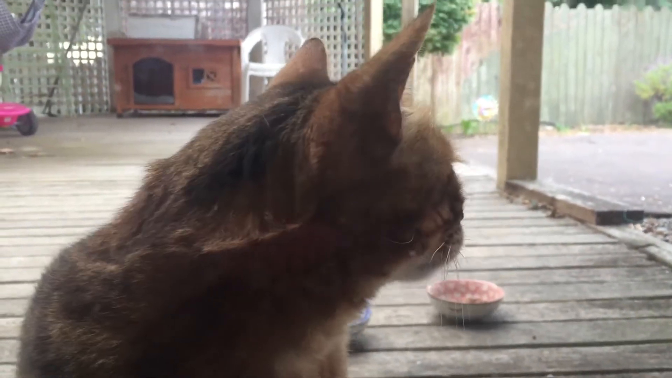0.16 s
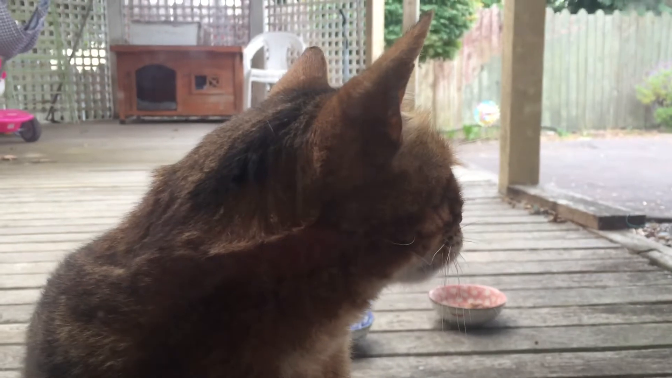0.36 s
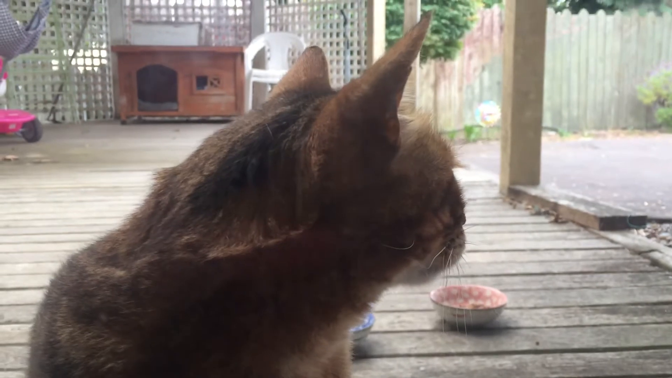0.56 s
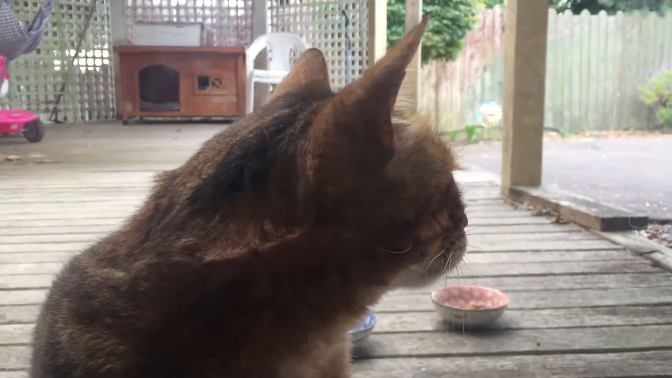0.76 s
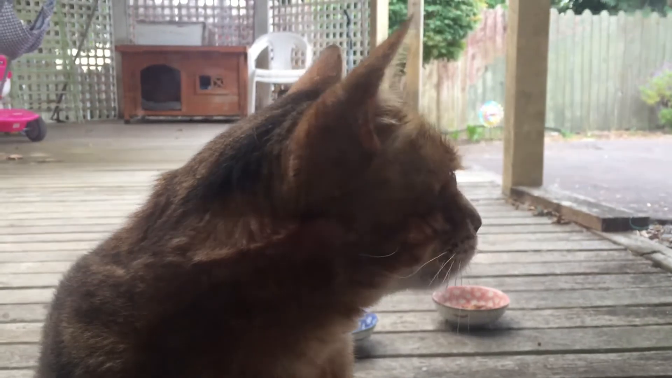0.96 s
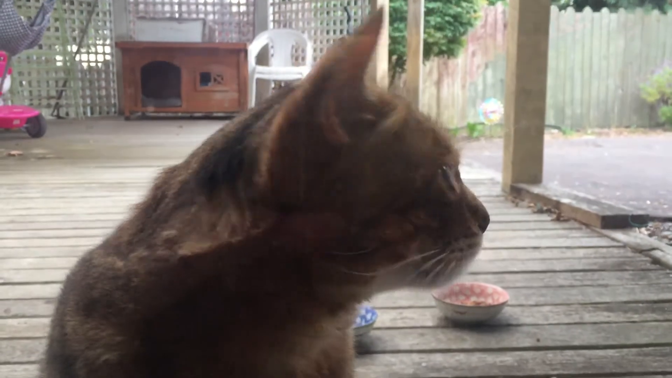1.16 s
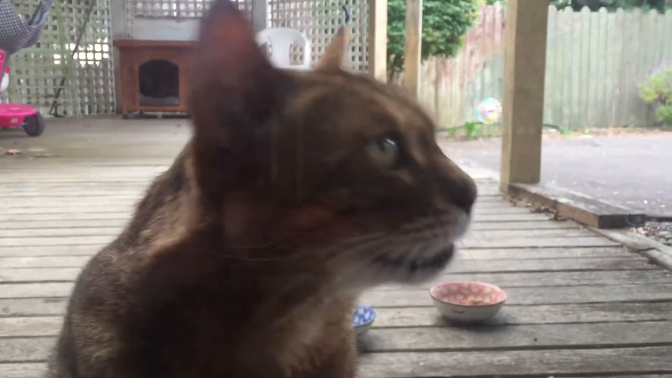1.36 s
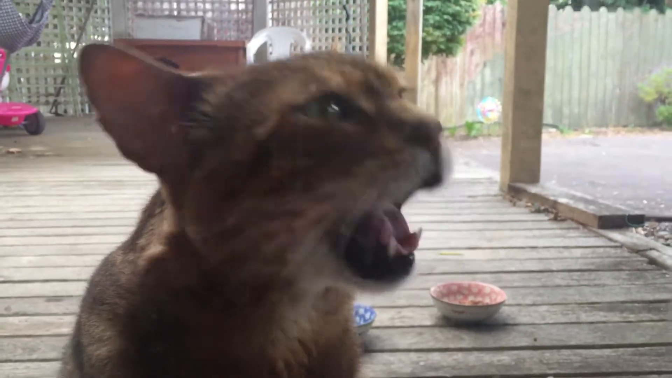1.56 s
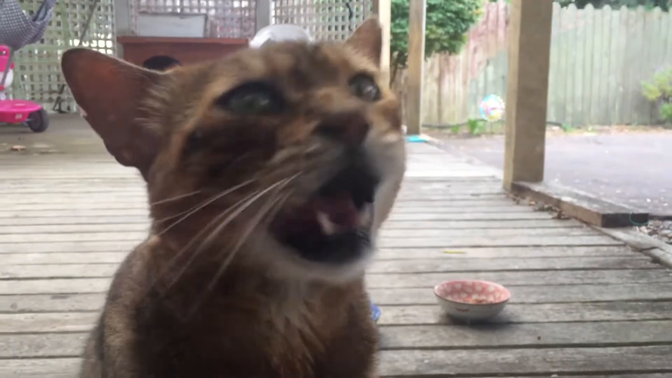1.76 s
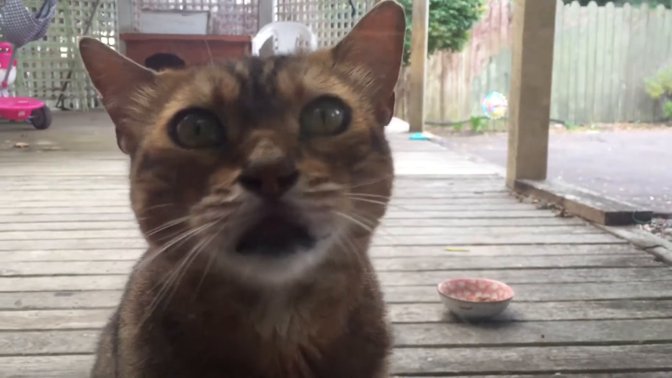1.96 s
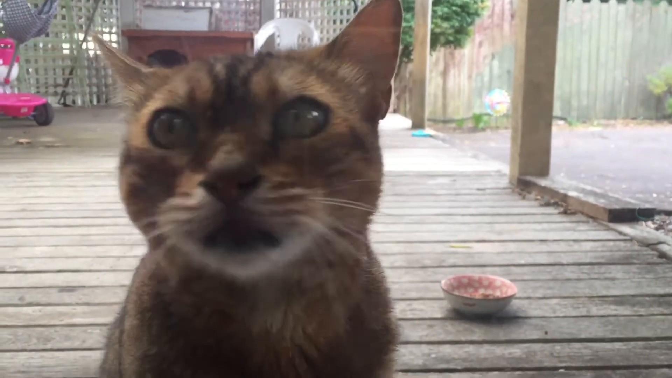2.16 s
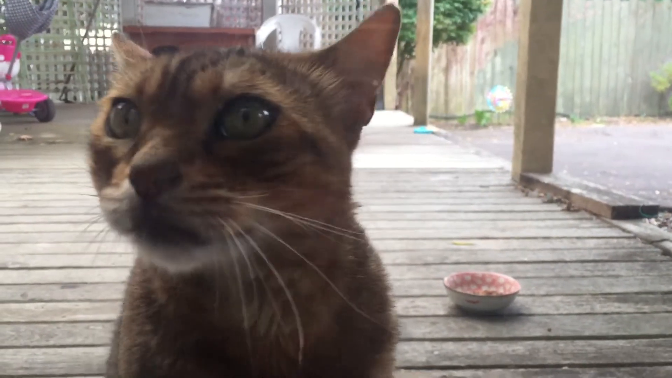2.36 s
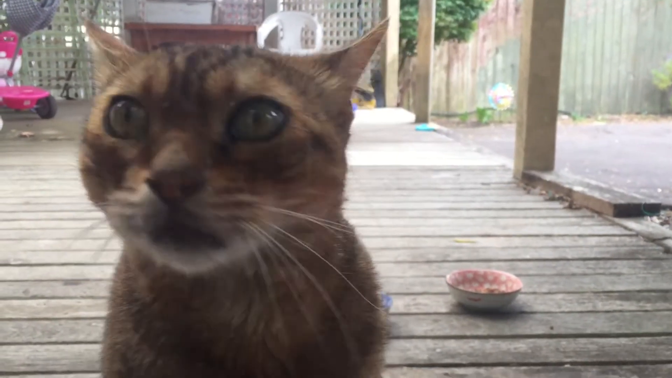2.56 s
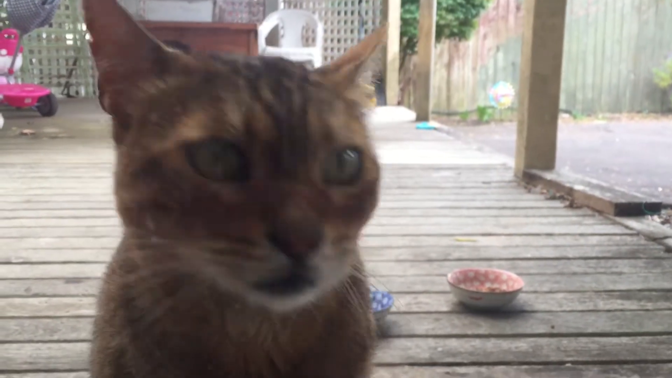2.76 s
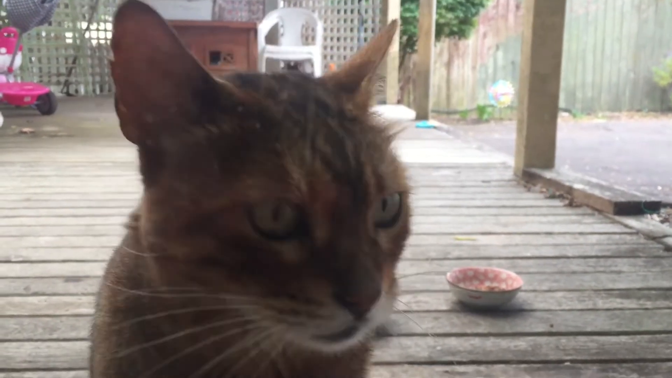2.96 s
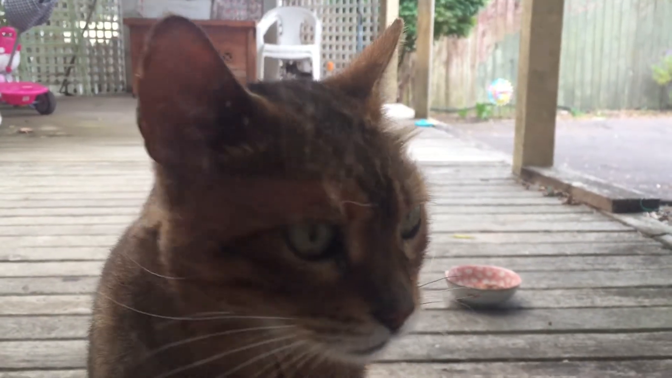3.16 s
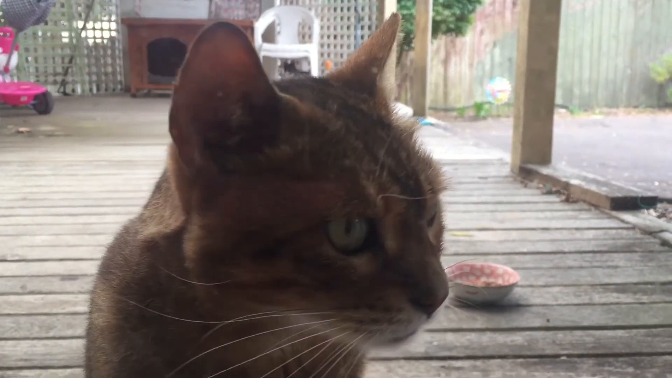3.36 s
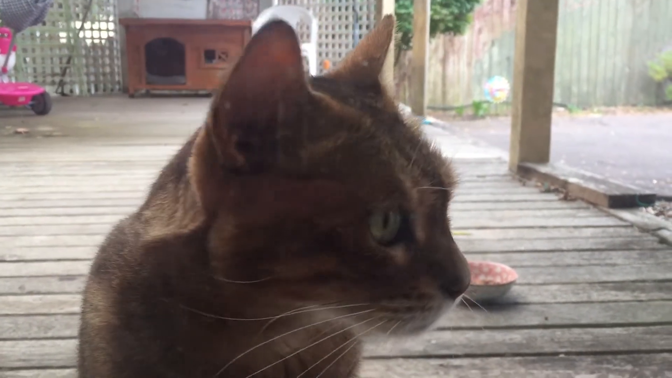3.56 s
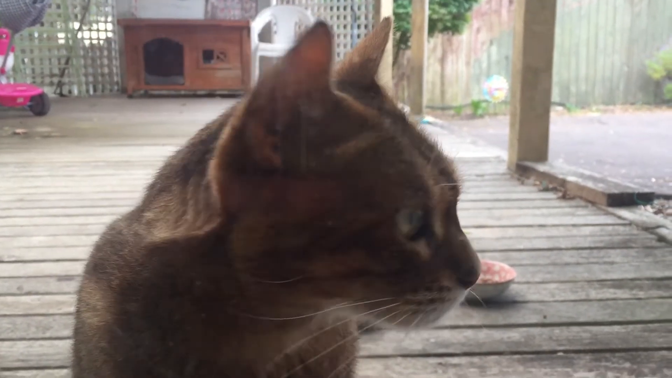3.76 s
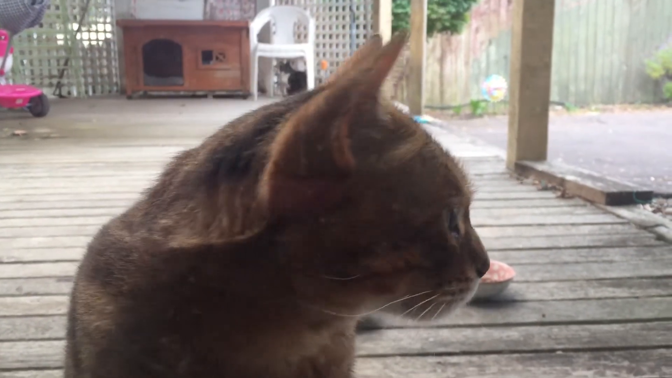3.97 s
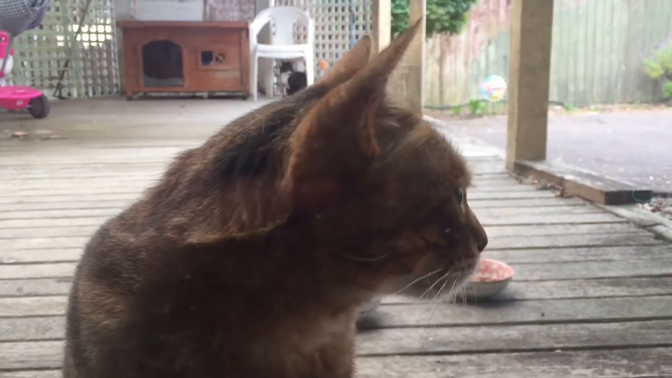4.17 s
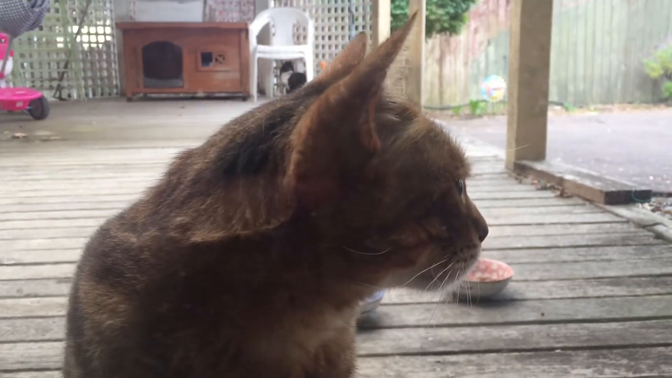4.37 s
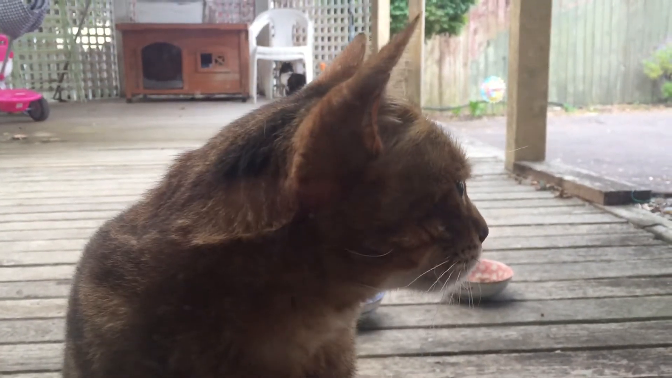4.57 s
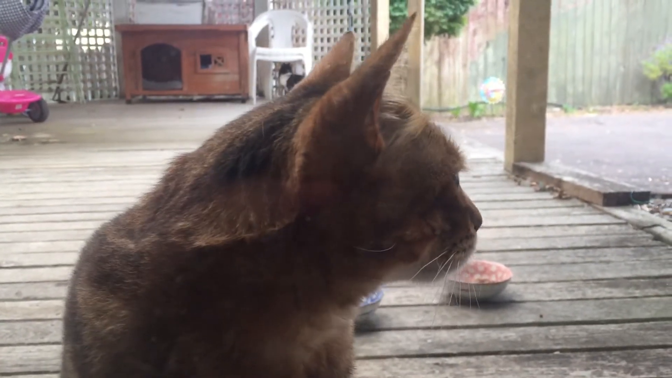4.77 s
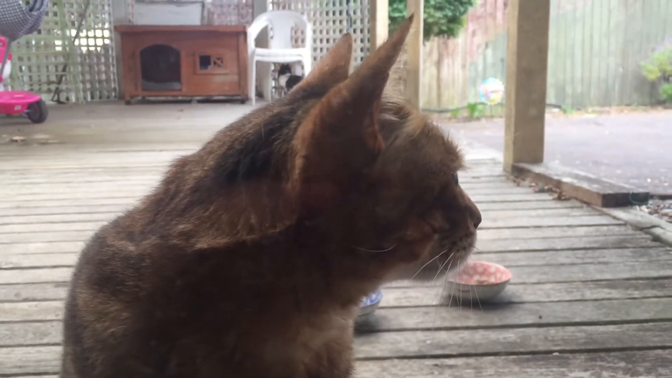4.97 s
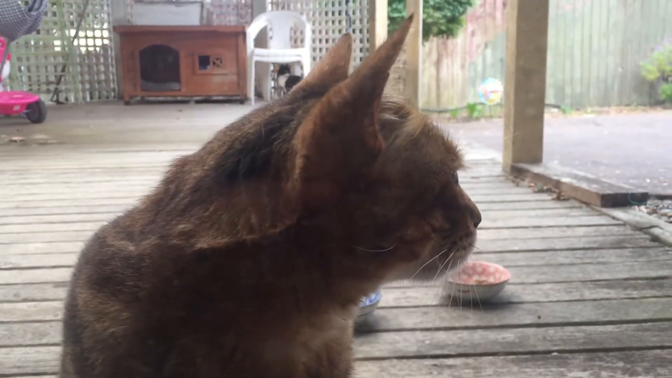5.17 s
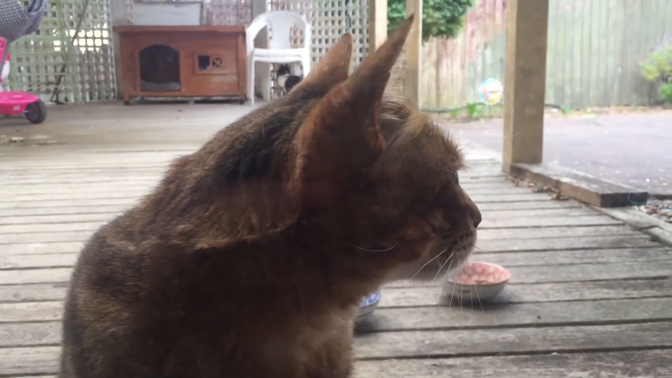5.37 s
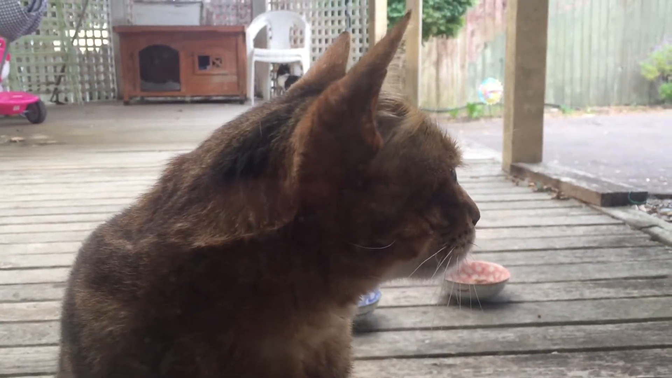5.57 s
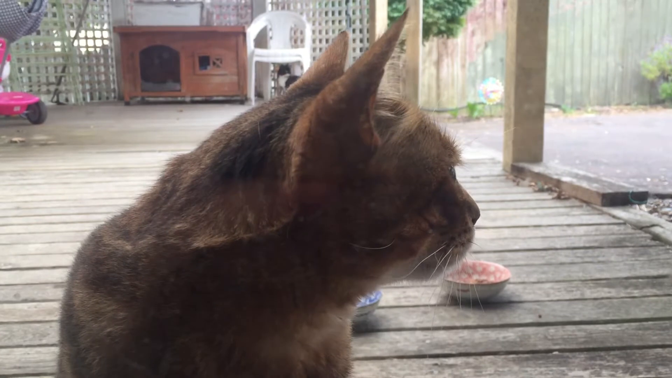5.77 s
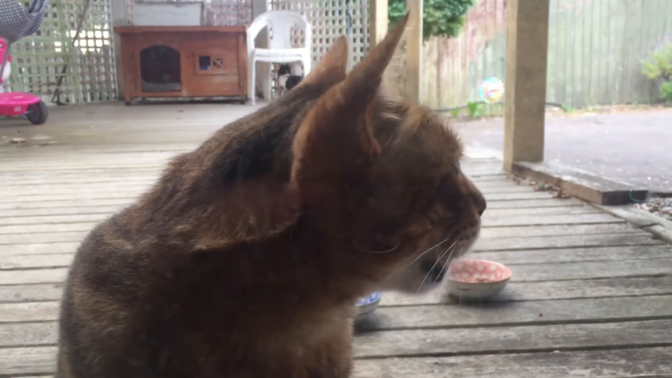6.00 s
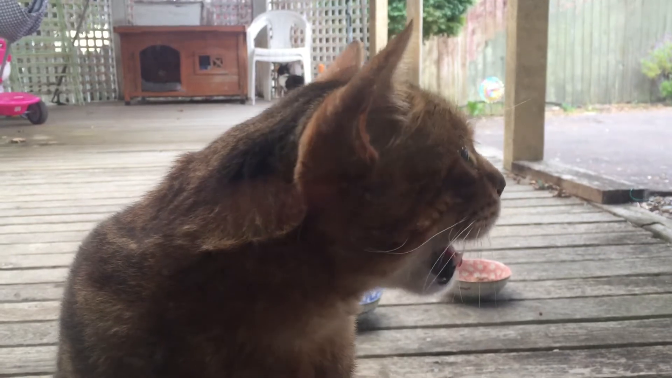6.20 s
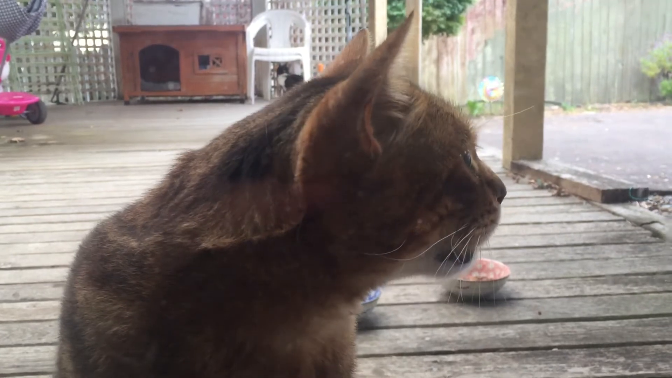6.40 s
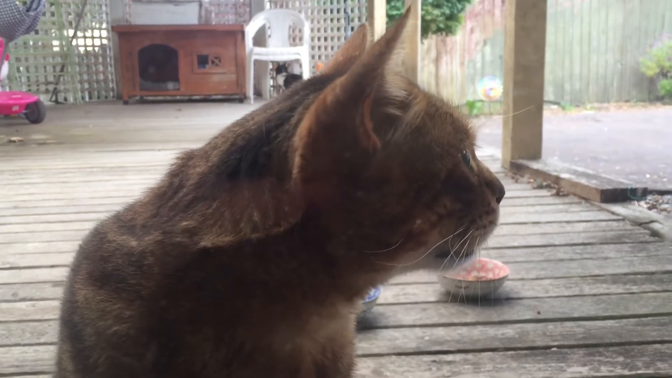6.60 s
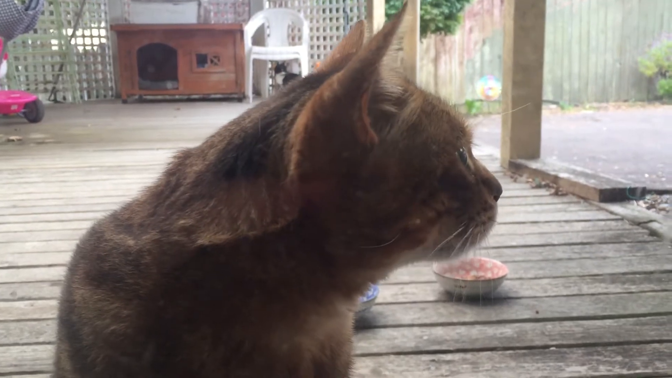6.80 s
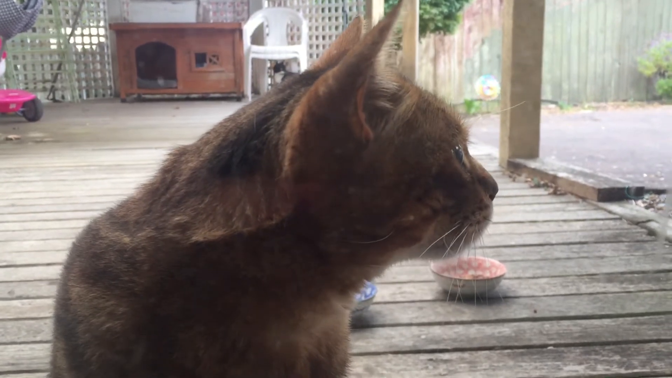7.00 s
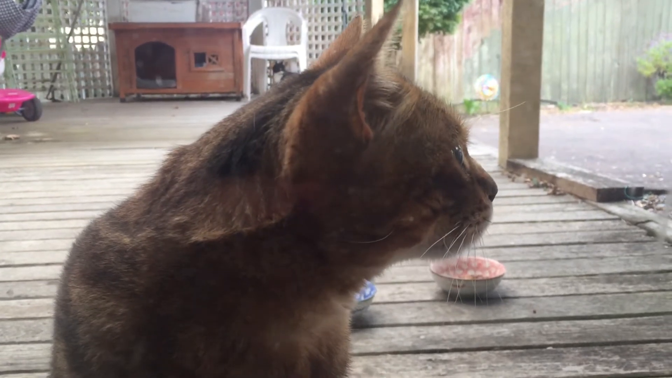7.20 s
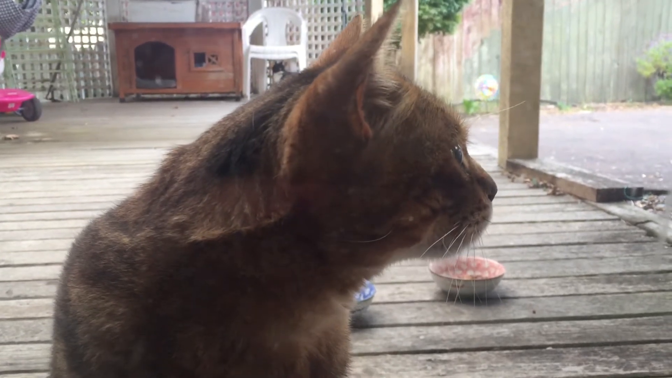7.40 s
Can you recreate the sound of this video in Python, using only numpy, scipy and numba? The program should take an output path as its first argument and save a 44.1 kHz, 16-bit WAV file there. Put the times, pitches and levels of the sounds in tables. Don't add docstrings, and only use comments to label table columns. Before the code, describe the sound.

Quiet outdoor background of soft microphone hiss and low traffic, with a far engine droning upward in short pulls. A nearby cat calls once, clean and nasal, with a short woody echo. A brief paw scrape and light ticks follow, then two hollow wooden gate bangs with loose clatter, the second sharper and shorter. Traffic swells softly, then comes a second, slightly shorter meow with a hoarse, trembling end.

```python
import sys
import numpy as np
from scipy import signal
from scipy.fft import rfft, irfft
from scipy.io import wavfile
from scipy.ndimage import uniform_filter1d
from numba import njit

SR = 44100
rng = np.random.default_rng(int(sys.argv[2]) if len(sys.argv) > 2 else 0)


def amplitude_ratio(level_db):
    exponent = np.asarray(level_db, float) / 20
    return 10 ** exponent


def wav_out(sig):
    wavfile.write(sys.argv[1], SR, np.round(np.clip(np.atleast_2d(sig).T, -1, 1) * 32767).astype(np.int16))


N = 328184
T = np.arange(N) / SR


def level(x, db):
    return x * amplitude_ratio(db) / np.sqrt(np.mean(x ** 2))


def colour(points, hz):
    f, db = np.transpose(points)
    return np.interp(np.log(hz + 1), np.log(f), db, left=-90, right=-90)


def noise(points):
    white = rfft(rng.standard_normal(N))
    hz = np.arange(len(white)) * SR / N
    return level(irfft(white * amplitude_ratio(colour(points, hz)), N), 0)


def play(table):
    s, *columns = np.transpose(table)
    gate = np.clip(np.minimum(T - s[0], s[-1] - T) / 0.025, 0, 1)
    return gate, [np.interp(T, s, c) for c in columns]


def walk(rate):
    k = int(SR / rate)
    steps = np.repeat(rng.standard_normal(N // k + 1), k)
    return 1.48 * uniform_filter1d(uniform_filter1d(steps, k), k)[:N]


def ring(x, hz, t60):
    pole = np.exp(2j * np.pi * hz / SR - np.log(1000) / (t60 * SR))
    return signal.lfilter([1], [1, -pole], x).imag


def swell(s, hold, db, attack, release, sag_db=0, depth_db=20):
    top_s = s + attack
    end_s, end_db = top_s + hold, db - sag_db * hold
    return np.array([(s, db - depth_db), (top_s, db), (end_s, end_db), (end_s + release, end_db - depth_db)])


def with_pitch(rows, hz, rise_hz=0):
    s, db = rows.T
    return np.transpose([s, hz + rise_hz * (s - s[0]), db])


def tone(tables, waver_db, second_db):
    out = np.zeros(N)
    for table in tables:
        gate, (hz, db) = play(table)
        phase = 2 * np.pi * np.cumsum(hz) / SR
        wave = np.sin(phase) + amplitude_ratio(second_db) * np.sin(2 * phase)
        out += gate * amplitude_ratio(db + 10 * np.log10(2) + waver_db * walk(25)) * wave
    return out


def town():
    # f/Hz, level/dB per Hz
    rumble_colour = [(12, -58), (20, -38), (37, -4), (86, -0.5), (107, 0.5), (125, -7.5), (140, -6.5),
                     (189, -7.5), (410, -30), (700, -26.5), (910, -81), (1540, -120)]
    # f/Hz, level/dB per Hz
    hiss_colour = [(200, -10.5), (300, -1), (520, -6.5), (1600, -9), (4300, -12.5), (4950, -16),
                   (5700, -13.5), (7000, -16), (7700, -18.5), (8600, -16.5), (9800, -18.5), (10450, -23),
                   (11300, -19), (15680, -22.5)]
    # t/s, half length/s, rise/dB
    rumble_swells = [
        (0.287, 0.068, 5.5),
        (1.3, 0.34, 1),
        (4.3, 0.55, 7.5),
        (5.5, 0.26, 1),
        (6.704, 0.1, -1),
    ]
    db = -68.5 + sum(up_db * np.exp(-((T - s) / half) ** 2) for s, half, up_db in rumble_swells)
    flicker_db = 1.5 * walk(8)
    return amplitude_ratio(db + flicker_db) * noise(rumble_colour) + amplitude_ratio(-72) * noise(hiss_colour)


def engine():
    # t/s, hold/s, level/dB, firing tone f/Hz
    gears = [
        (.45, 0.075, -61, 129),
        (0.867, 0.13, -59, 147),
        (1.195, 0.051, -65.5, 159),
        (2.602, 0.21, -66.5, 135),
        (3.407, 0.13, -71.5, 149),
        (6.78, 0.091, -70.5, 142),
    ]
    attack_s, release_s, climb_hz_s = 0.18, 0.12, 18
    pulls = []
    for s, hold, db, hz in gears:
        rise_and_fall = swell(s, hold, db, attack_s, release_s, depth_db=6)
        pulls.append(with_pitch(rise_and_fall, hz, climb_hz_s))
    return amplitude_ratio(-3.5) * tone(pulls, waver_db=2, second_db=-24)


@njit
def boards(x, lags, gain, damp):
    line, soft, out = np.zeros((8, 4096)), np.zeros(8), np.zeros(len(x))
    for i in range(len(x)):
        total = 0.
        for k in range(8):
            soft[k] += (1 - damp) * (gain[k] * line[k, (i - lags[k]) & 4095] - soft[k])
            total += soft[k]
            out[i] += soft[k] * (1 - 2 * (k % 2))
        for k in range(8):
            line[k, i & 4095] = x[i] + soft[k] - total / 4
    return out


def deck_echo(send):
    t60_s, damp = 0.32, 0.5
    lags = rng.integers(500, 2600, 8)
    send = signal.sosfilt(signal.butter(2, 450, "high", fs=SR, output="sos"), send)
    return boards(send + 1e-18, lags, amplitude_ratio(-60 * lags / SR / t60_s), damp)


def ticks():
    # t/s, peak level/dB, f/Hz, t60/s
    taps = [
        (.254, -53, 678, 0.034),
        (.256, -56, 390, 0.029),
        (1.553, -53, 1480, 0.044),
        (2.345, -59.5, 946, 0.2),
        (4.411, -40.5, 1570, .18),
        (4.413, -39.5, 1680, .2),
        (4.87, -68, 4000, .04),
        (5.42, -66, 2690, .03),
        (5.46, -66, 3620, .03),
        (5.841, -72, 1570, .2),
    ]
    out = np.zeros(N)
    for s, db, hz, t60 in taps:
        age = np.clip(T - s, 0, None)
        decay = 1000. ** (-age / t60) * (1 - np.exp(-age / .003))
        out += amplitude_ratio(db) * np.sin(2 * np.pi * hz * age) * decay
    return out


def scuff():
    # f/Hz, level/dB per Hz
    scrape_colour = [(180, -49), (300, -10), (369, -15), (648, 0.5), (804, -7), (916, 1.5), (1410, -8),
                     (1630, 0.5), (2110, -24), (4000, -30), (5200, -61), (8800, -120)]
    gate, (db,) = play(swell(2.335, 0.045, 0, attack=0.063, release=0.048, depth_db=18))
    thud = noise([(60, -5), (95, -2.5), (140, -14), (205, 2), (280, -29)])
    scrape = amplitude_ratio(-56.5 + 1.0 * walk(150)) * noise(scrape_colour)
    return gate * amplitude_ratio(db) * (scrape + amplitude_ratio(-58.5) * thud)


def gate_boom(push):
    # f/Hz, level/dB, t60/s
    panel = [(54.4, -8, 0.65), (112, 0, 0.32), (153.2, -0.5, 0.24), (186.6, -7.5, 0.48),
             (246.2, -11.5, 0.63), (323, -28, 0.44)]
    # t/s, hold/s, level/dB, f/Hz
    panel_swings = [
        (3.877, .06, -36, 85),
        (3.985, 0.13, -44.5, 84.4),
        (4.115, .14, -46, 85),
        (4.391, 0.049, -24.5, 84.2),
        (4.515, .14, -40.5, 90.3),
    ]
    attack_s, release_s, sag_db_s = .025, 0.059, 70
    thud = sum(amplitude_ratio(db) * ring(push, hz, t60) for hz, db, t60 in panel)
    swings = []
    for s, hold, db, hz in panel_swings:
        swings.append(with_pitch(swell(s, hold, db, attack_s, release_s, sag_db_s), hz))
    return tone(swings, waver_db=.3, second_db=-30) + amplitude_ratio(-2.0) * thud


def gate_rattle(shake):
    # f/Hz, level/dB per Hz
    rattle_colour = [(250, -10.5), (330, -11), (500, -19.5), (700, -13), (870, -19), (1380, -10.5),
                     (1630, -2.5), (1850, -10), (2800, -14), (3700, -23), (4200, -21), (5000, -33),
                     (5600, -30), (11000, -63)]
    # f/Hz, level/dB, t60/s
    slat_modes = [(298.6, -11, 0.18), (682, -10.5, 0.094), (1031, -3, 0.15), (1230, 2.5, 0.044),
                  (1570, -17, 0.033), (1635.5, -3.5, 0.088), (1750, -9, 0.032), (2010, -0.5, 0.053),
                  (2130, -7, 0.036), (2580, -4.5, 0.049), (3190, -5.5, .06), (4100, -11, 0.062)]
    slats = noise(rattle_colour) * amplitude_ratio(2.2 * walk(200) + .8 * walk(50))
    dull = signal.sosfiltfilt(signal.butter(2, 2800, fs=SR, output="sos"), slats)
    rattle = amplitude_ratio(-7.5) * (np.sqrt(shake) * [dull, slats - dull]).sum(axis=0)
    return rattle + amplitude_ratio(-41.5) * sum(amplitude_ratio(db) * ring(rattle, hz, t60) for hz, db, t60 in slat_modes)


def gate_bangs():
    # t/s, rattle level/dB, thud level/dB, rattle length/s
    bangs = [
        [(3.889, -36.5, -42, 0.055), (3.92, -34, -36, .015), (4.013, -36.5, -45, 0.029),
         (4.055, -45, -57, 0.054), (4.1, -43.5, -51, 0.022), (4.146, -50.5, -49.5, 0.042),
         (4.199, -57.5, -59, 0.077)],
        [(4.409, -27.5, -40, 0.048), (4.427, -25, -39.5, 0.039), (4.469, -35, -40, 0.012),
         (4.54, -39, -51, 0.053)],
    ]
    treble_db, treble_loss_db, treble_fades_s = 5, 13, 0.089
    shake, push = np.zeros((2, N)), np.zeros(N)
    for bang in bangs:
        first = bang[0][0]
        for s, rattle_db, thud_db, length in bang:
            bright_db = rattle_db + treble_db - treble_loss_db * (1 - np.exp((first - s) / treble_fades_s))
            age = np.clip(T - s, 0, None)
            shape = (1 - np.exp(-age / 0.0063)) ** 2 * np.exp(-age / length)
            shake += (amplitude_ratio([[rattle_db], [bright_db]]) * shape) ** 2
            push[int(s * SR)] += amplitude_ratio(thud_db)
    push = np.convolve(push, np.hanning(int(0.0046 * SR)) / (0.0016 * SR))[:N]
    return gate_rattle(shake), gate_boom(push)


def meow(table, quaver, turned):
    # f/Hz, level/dB
    nose = [(4200, -43.5), (4700, -41.5), (5300, -43.5), (6800, -47.5), (7800, -55), (9000, -60)]
    gate, columns = play(table)
    on = gate > 0
    t = T[on]
    smooth = [uniform_filter1d(c, size=size)[on] for c, size in zip(columns, (800, 700, 700, 700))]
    hz, db, mouth_hz, throat_db = smooth
    chest_turn_db, palate_turn_db, edge_turn_db = turned

    wide = .5 + .5 * np.tanh((mouth_hz - 1570) / 60)
    wide = np.maximum.accumulate(wide[::-1])[::-1]
    shut_hz, wide_hz = 2380, 3116 + 4.3 * (hz - 459)
    throat_hz = shut_hz + (wide_hz - shut_hz) * wide
    chest_db = -55.5 + chest_turn_db + 0.27 * (db + throat_db + 44.5) - db
    chest_db = chest_db.clip(-40, -4)
    palate_db = throat_db - 2 + palate_turn_db

    crest, rate, tires, last_hoarse, first_db = quaver
    clean_hoarse = .09
    tired = ((t - tires) / .13).clip(0, 1)
    swing = .003 + .035 * tired ** 2
    throb_db = first_db + (4.5 - first_db) * tired
    onset = .5 * np.exp(-((t - t[0]) / .035) ** 2 / 2)
    tiring = ((t - tires) / (t[-1] - tires)).clip(0, 1)
    hoarse = clean_hoarse + onset + (last_hoarse - clean_hoarse) * tiring
    beat = np.cos(2 * np.pi * rate * (t - crest))
    phase = 2 * np.pi * np.cumsum(hz * (1 + swing * beat + 0.052 * hoarse * walk(150)[on])) / SR
    order = np.arange(1, 19)[:, None]
    f = hz * order

    def resonance(centre_hz, width_hz, power):
        return 1 / (1 + (2 * (f - centre_hz) / width_hz) ** power)

    mouth = resonance(mouth_hz, 408 * (1 + 0.91 * hoarse), 2) ** 1.78
    gain = mouth + amplitude_ratio(throat_db) * resonance(throat_hz, 495, 4)
    gain = gain + amplitude_ratio(chest_db) * resonance(816, 670, 4)
    gain = gain + amplitude_ratio(palate_db) * resonance(2200, 500, 4)
    edge_db = throat_db + edge_turn_db - 8.0 + 0.93 * (hz - 450).clip(-25, 0)
    gain = gain + amplitude_ratio(edge_db) * resonance(3700, 600, 4)
    gain = gain / np.sqrt(1 + (f / 4100) ** 16)
    loudness = np.sqrt((gain[1:] ** 2).sum(axis=0) / 2)
    gain = (gain + mouth * (amplitude_ratio(throb_db * beat) - 1)) / loudness
    gain[0] = amplitude_ratio(-38 + 1.9 * (db.max() - db - 4).clip(0, 17) + 4 * walk(30)[on] - 25 * onset)

    patches = np.array([amplitude_ratio(4 * walk(20) + 5.0 * walk(300))[on] for _ in f])
    flicker = []
    for k in range(len(f)):
        flicker.append(amplitude_ratio(min(.5 * k, 1.8) * walk(30)[on] + (.7 + 4 * hoarse) * walk(150)[on]))
    nose_db = colour(nose, f) + 3.5 + 0.48 * throat_db + edge_turn_db / 2
    gain = (gain + amplitude_ratio(nose_db) * patches) * np.array(flicker)
    uneven = 1 + 1.5 * (hoarse - .3).clip(0, .5) * np.cos(phase / 2)
    gain = gain * amplitude_ratio(-24 * onset * (f / 1700 - 1).clip(0, 1))
    harmonics = gain * np.sin(order * (phase + 0.81 * order))
    out = np.zeros(N)
    out[on] = amplitude_ratio(db) * uneven * harmonics.sum(axis=0)
    return gate * out


def cat_calls():
    # t/s, pitch f/Hz, level/dB, mouth resonance f/Hz, throat level/dB against the mouth
    calls = [
        [(1.525, 325, -72, 1420, -25), (1.565, 348, -54, 1350, -17), (1.6, 372.4, -41.5, 1570, -36.5),
         (1.665, 429, -43.5, 1645, -3), (1.752, 457.2, -41.5, 1635, -6.5), (1.96, 401.9, -43.5, 1570, -10),
         (2.01, 395.2, -46.5, 1245, -12.5), (2.1, 386, -56, 756, -35), (2.265, 323.7, -72, 650, -35)],
        [(6.07, 304, -60.5, 1200, -18), (6.114, 335, -70.5, 1170, -24), (6.134, 393, -52, 1580, -18),
         (6.185, 425, -44, 1660, -15), (6.285, 441, -44.5, 1680, -1.5), (6.44, 421.7, -43.5, 1665, -18),
         (6.525, 413, -43, 1230, -16), (6.625, 398.2, -50.5, 1300, -18), (6.82, 335.8, -71, 1010, -23)],
    ]
    # a crest t/s, rate f/Hz, tiring starts t/s,
    # last hoarseness [0-1], first throb level/dB
    quavers = [
        (2.082, 27.8, 1.97, .6, 2.5),
        (6.582, 28.5, 6.55, .7, 3.5),
    ]
    # chest level/dB, palate level/dB, edge level/dB
    head_turns = [
        (1, 1.5, 3.5),
        (-6, -12.5, -8),
    ]
    return sum(meow(*call) for call in zip(calls, quavers, head_turns))


def scene():
    background = town() + engine()
    small = ticks() + scuff()
    rattle, boom = gate_bangs()
    cat = cat_calls()
    echo = deck_echo(amplitude_ratio(-14.5) * cat + amplitude_ratio(-11.0) * rattle + amplitude_ratio(-10.0) * small)
    return (amplitude_ratio(-0.5) * cat + rattle + boom + small + echo + background)[None]


def low_pass(x):
    return signal.sosfilt(signal.butter(12, 15670, fs=SR, output="sos"), x)


def record(dry):
    thin = signal.sosfilt(signal.butter(4, 47, "high", fs=SR, output="sos"), dry)
    return low_pass(thin)


dry = scene()
out = record(dry)
wav_out(out)
```